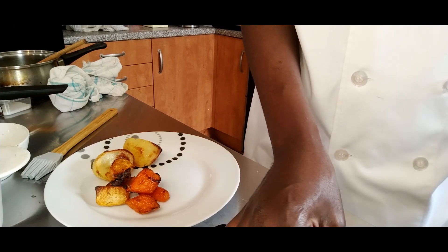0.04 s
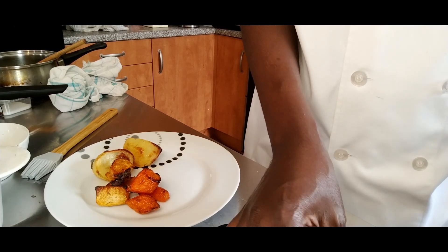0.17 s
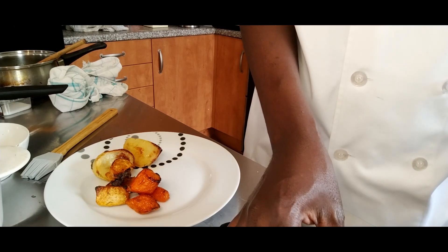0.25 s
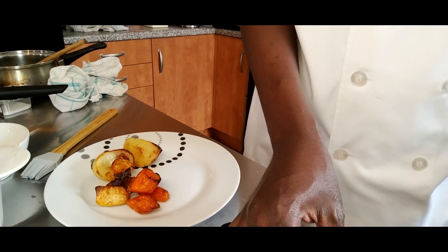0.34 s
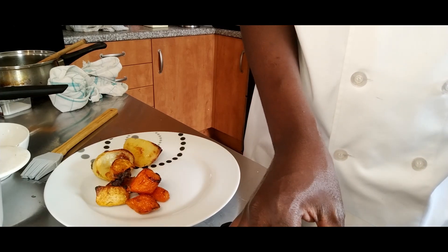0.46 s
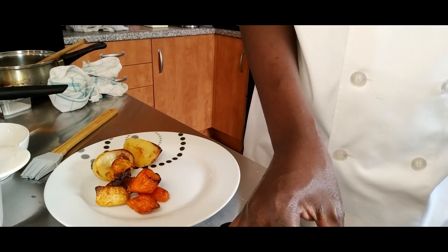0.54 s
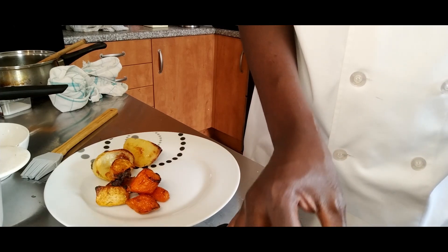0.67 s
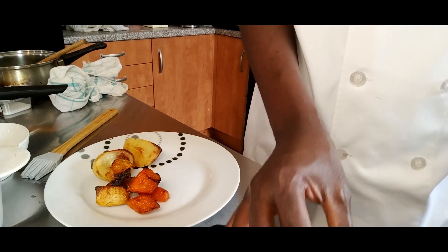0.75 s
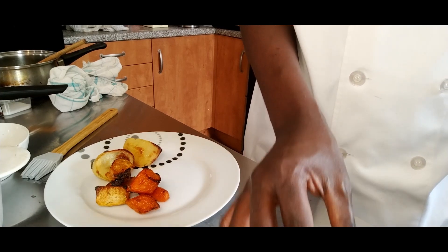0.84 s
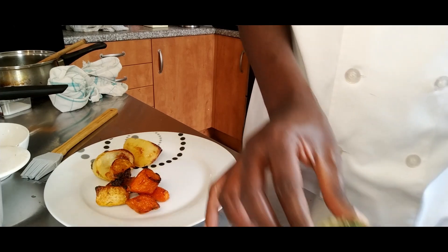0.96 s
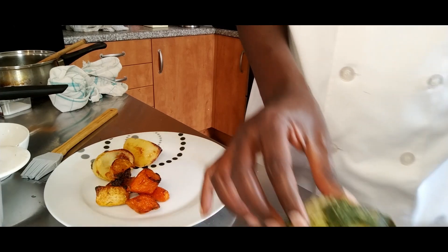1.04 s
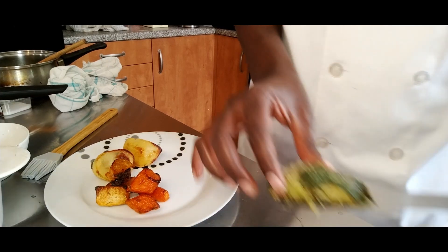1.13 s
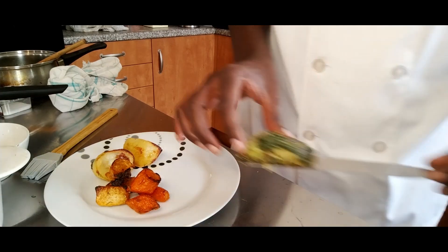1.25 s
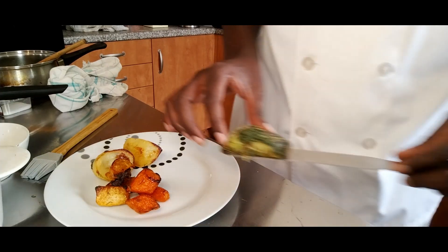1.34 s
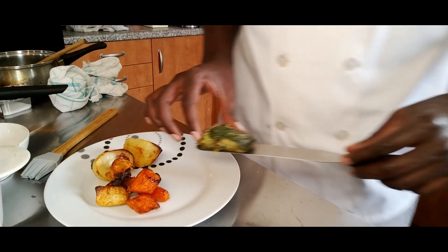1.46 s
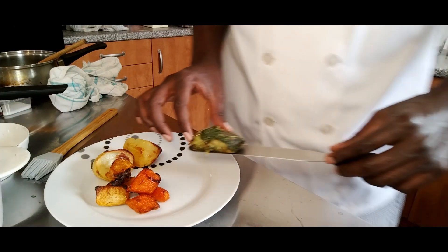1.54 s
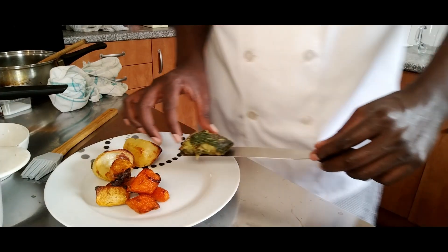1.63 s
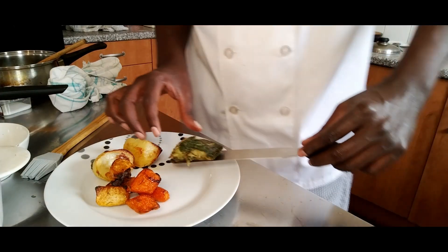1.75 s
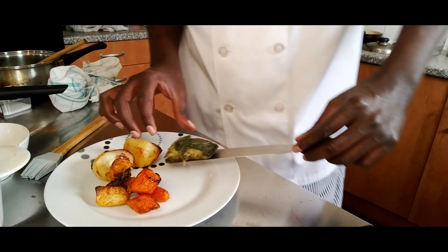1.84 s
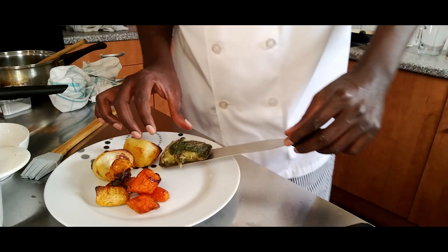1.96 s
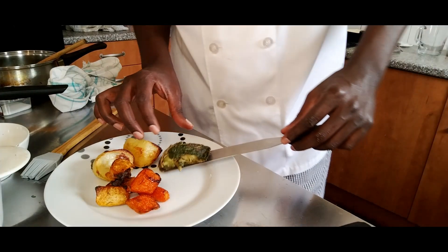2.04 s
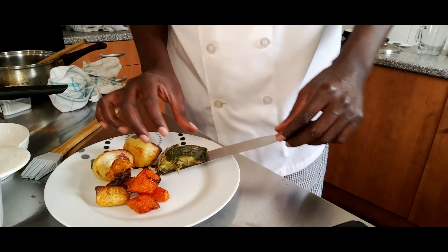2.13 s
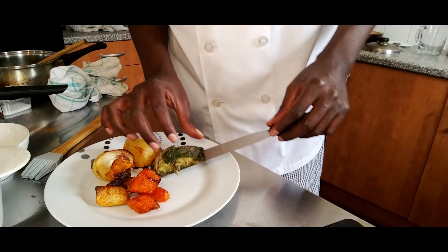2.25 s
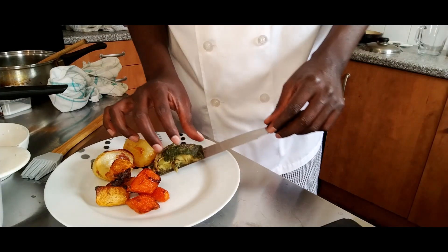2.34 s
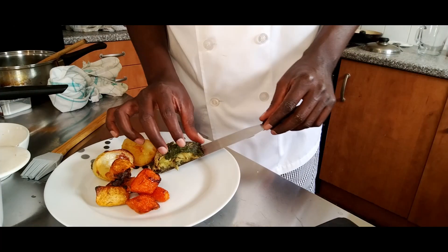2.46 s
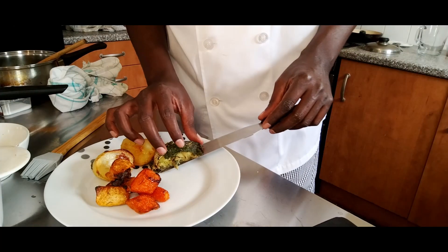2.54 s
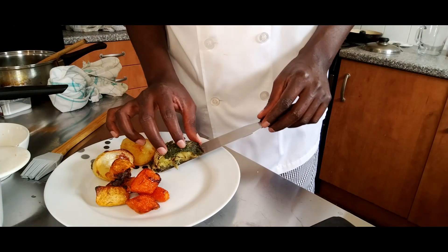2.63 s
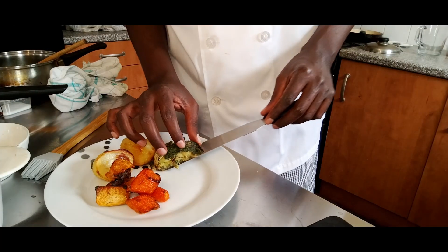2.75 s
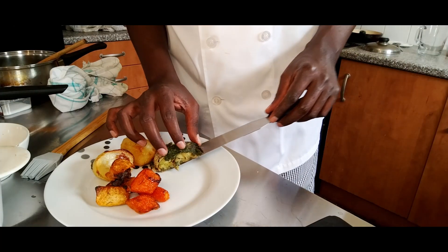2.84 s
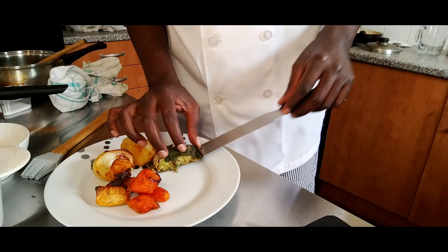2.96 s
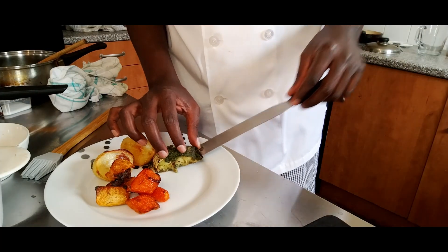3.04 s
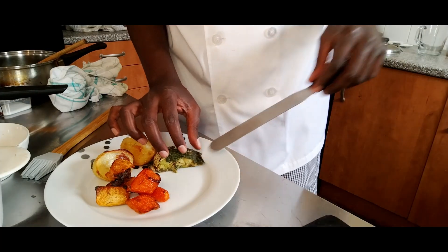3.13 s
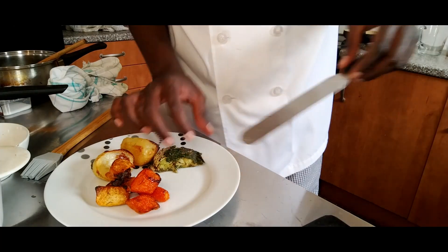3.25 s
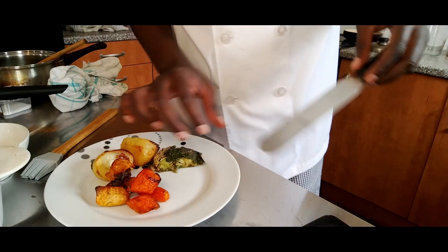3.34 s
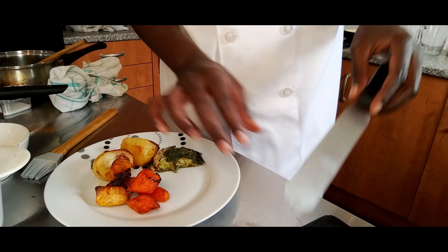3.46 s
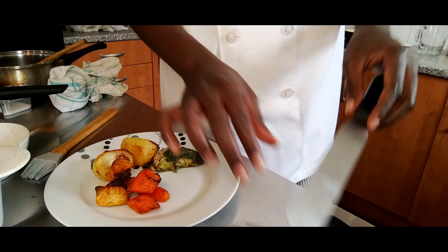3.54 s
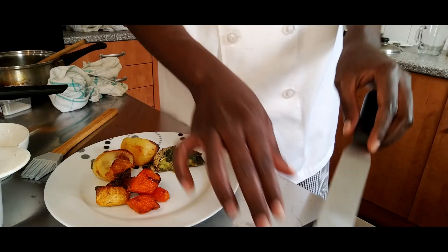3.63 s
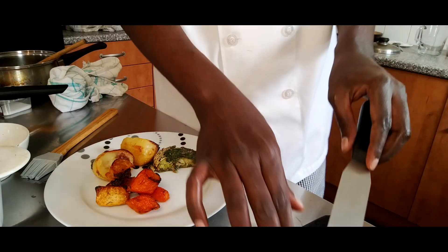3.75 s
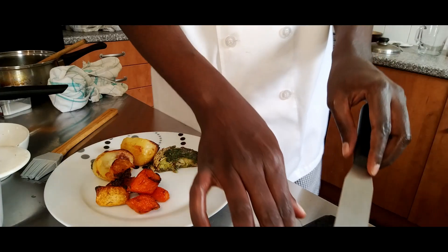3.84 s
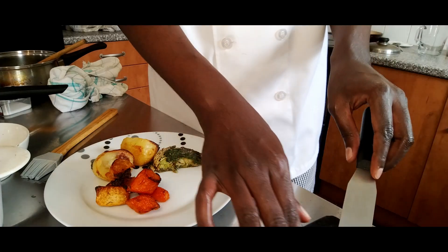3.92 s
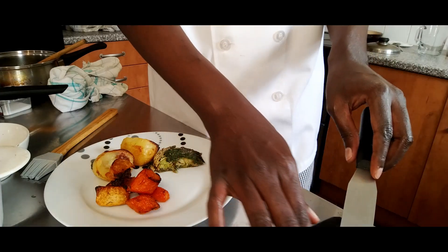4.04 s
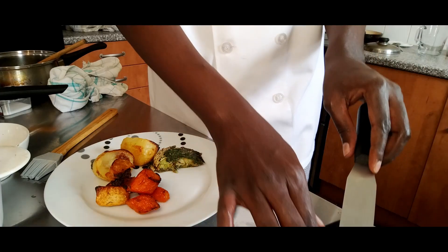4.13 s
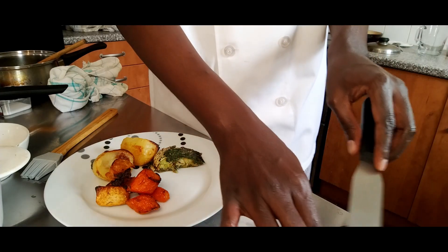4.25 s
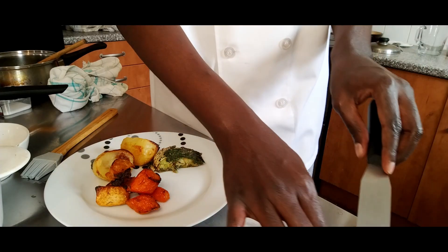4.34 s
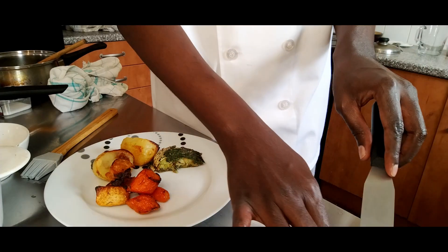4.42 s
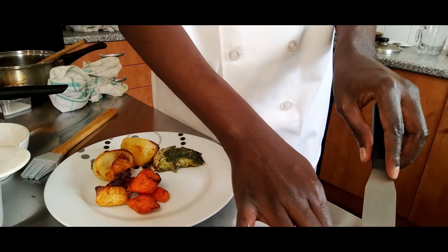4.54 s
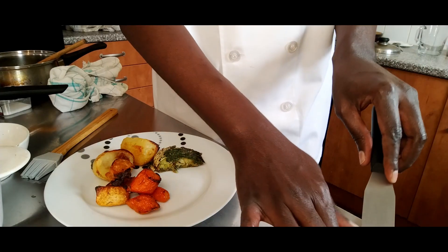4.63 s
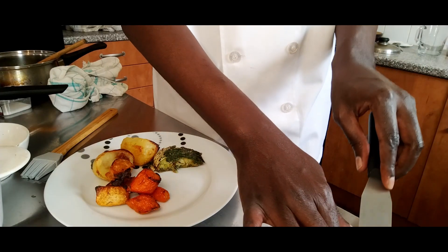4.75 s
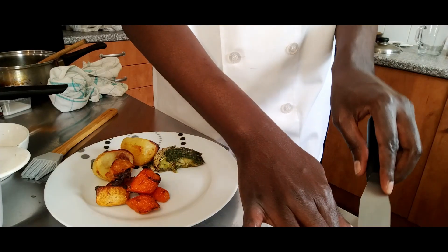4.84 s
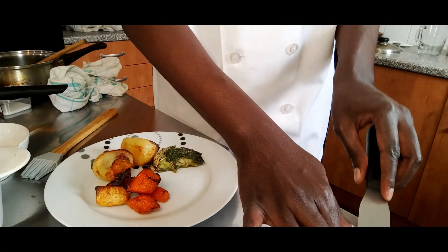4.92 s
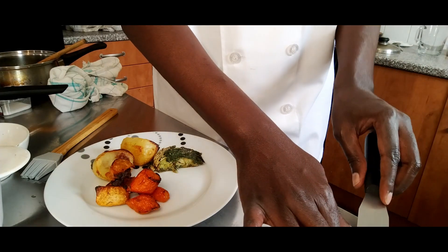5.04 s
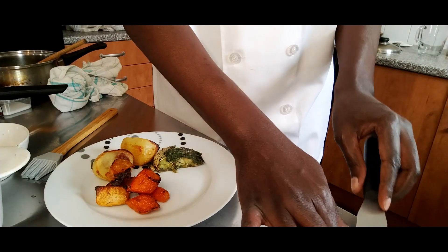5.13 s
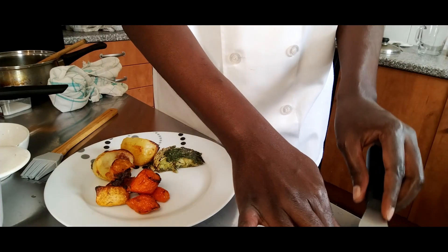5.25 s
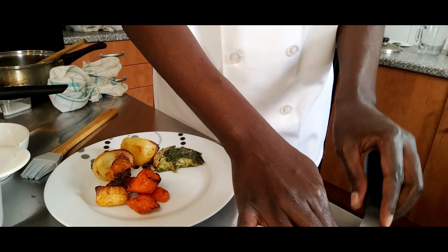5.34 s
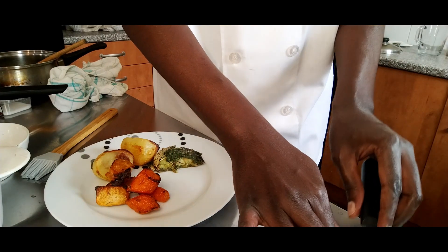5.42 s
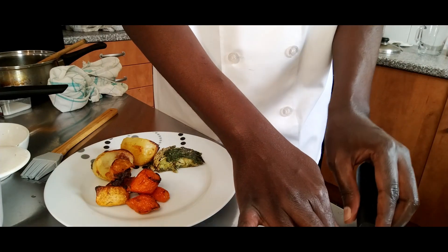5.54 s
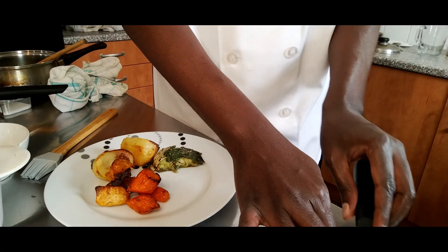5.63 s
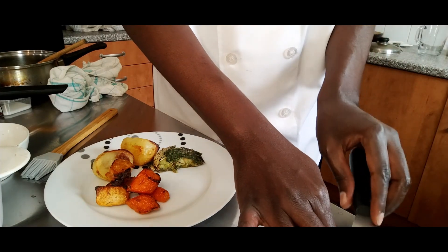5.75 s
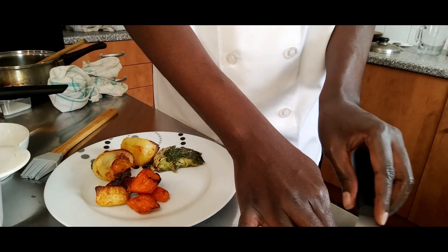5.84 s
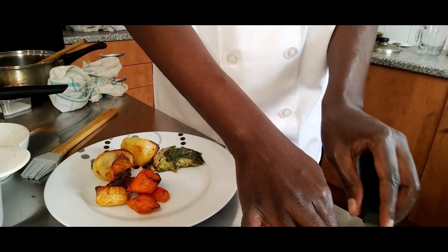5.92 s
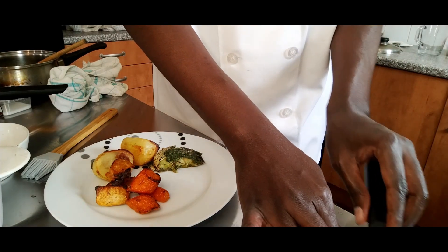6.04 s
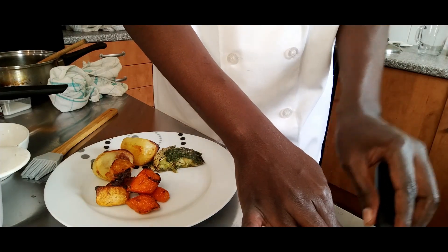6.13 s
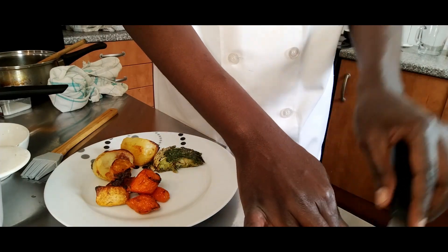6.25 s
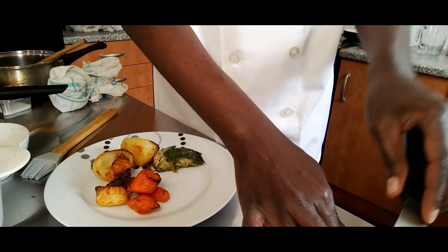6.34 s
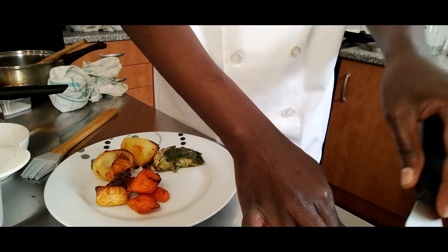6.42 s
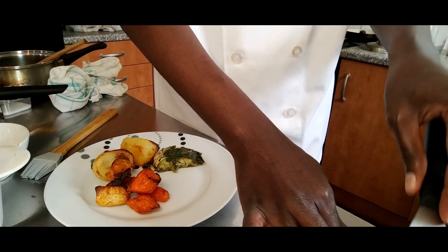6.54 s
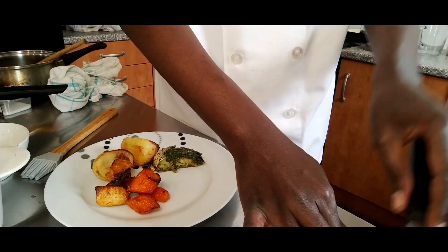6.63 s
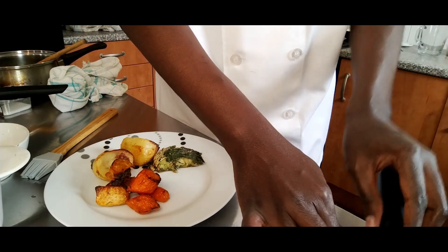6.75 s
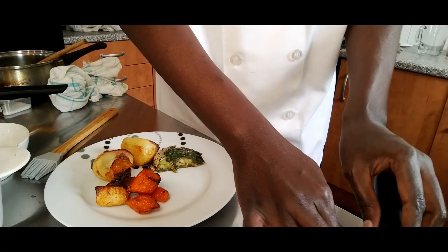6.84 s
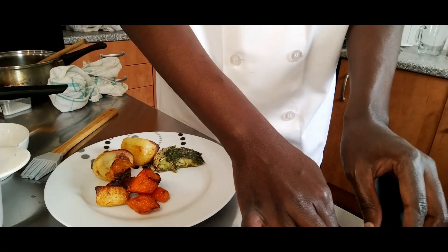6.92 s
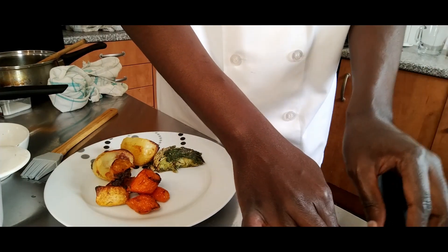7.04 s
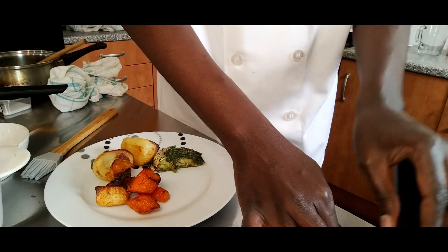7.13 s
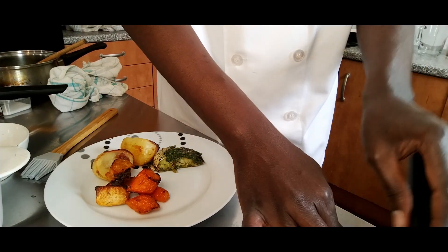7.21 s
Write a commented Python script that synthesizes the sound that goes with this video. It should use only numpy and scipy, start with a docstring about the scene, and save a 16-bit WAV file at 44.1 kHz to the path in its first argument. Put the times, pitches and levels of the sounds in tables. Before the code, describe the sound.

Crinkly sheet rustles and snaps on a tray, a pause with two light knife taps on a plate, then denser crackling over a faint fan hum.

```python
"""Close at a kitchen worktop, two microphones hear hands crumple a crinkly sheet on a tray: it rustles and snaps.
After the first second only cloth whispers; a sleeve brushes past, then a knife taps a ceramic plate twice.
A hand thumps the worktop, the blade pings faintly, and from about four seconds the sheet snaps again, ever denser.
Sheet: coloured grains, cracks and rings; plate: damped modes; thumps and rumble: low noise.
Throughout, a fan of shaped noise and tones, with hum, fills the room; the near sounds leave a short noise tail."""
import sys
import numpy as np
from scipy import signal
from scipy.fft import rfft, irfft, next_fast_len
from scipy.io import wavfile
from scipy.ndimage import uniform_filter1d

SR = 44100
rng = np.random.default_rng(int(sys.argv[2]) if len(sys.argv) > 2 else 0)


def digitize_waveform(pressure):
    """Quantize a signal to 16-bit integers and store it at the path in sys.argv[1].

    Rows of a 2-D input are taken as channels; values are limited to [-1, 1].
    """
    field = np.atleast_2d(pressure).T
    bounded = np.clip(field, -1, 1)
    quanta = np.round(bounded * 32767).astype(np.int16)
    wavfile.write(sys.argv[1], SR, quanta)


N = 321048

# bright voice of sheet and plate: (frequency [Hz], relative density [dB])
CRISP_SPECTRUM = [(3500, -14), (6000, 4.5), (8500, 9), (10500, 15), (12500, 13.5), (14000, 8)]
# dull voice of sheet and plate: (frequency [Hz], relative density [dB])
DULL_SPECTRUM = [(250, -62), (600, -7), (1000, -12), (1500, 1), (2100, 4.5), (2800, 3.5), (4000, 1.5),
                 (6000, 6), (9000, -21.5)]
# rings of the tray under the rub: (frequency [Hz], width [Hz], level [dB])
TRAY_RINGS = [(2800, 680, -8.5), (4140, 260, -10.5)]
# where the hand works the sheet: (time [s], left minus right [dB])
HAND_PLACE = [(0.0, 8), (0.4, 4), (0.7, 2.5), (2.0, -18), (4.0, -1.5), (5.2, 9), (5.6, 6.5), (6.1, -4),
              (6.5, 4), (7.279, 6)]

SHARED = 0.2             # share of power in a wide source that reaches both microphones alike
DULL_PAN_SHARE = 0.11    # the dull voice follows this much of the panning
RIGHT_LAG_S = 0.00027    # the right side lags by this in all but the plate's ring, which reaches the right first


def from_db(db):
    """Gain of a level in dB."""
    return 10 ** (np.asarray(db) / 20)


def rms_one(x):
    """Scaled to unit rms."""
    return x / np.sqrt(np.mean(x ** 2) + 1e-20)


def at_hz(points, hz):
    """A spectrum table read on a log frequency axis."""
    table_hz, table_db = np.transpose(points)
    return np.interp(np.log(hz), np.log(table_hz), table_db)


def in_time(rows, t):
    """The columns of a curve read at times t."""
    s, *columns = np.transpose(rows)
    return np.array([np.interp(t, s, c) for c in columns])


def drift(rate):
    """Slow random curve of unit rms: noise through two equal low-passes with their corner at rate [Hz]."""
    step = 40    # samples from one drawn point to the next
    r = np.exp(-2 * np.pi * rate * step / SR)
    noise = rng.standard_normal(N // step + 2002)
    slow = signal.lfilter([1], [1, -2 * r, r * r], noise)[2000:]    # settled part
    return np.interp(np.arange(N) / step, np.arange(len(slow)), rms_one(slow))


def sides(pan_db):
    """Left and right gain for a left-minus-right level, with power kept; both are 1 at the centre."""
    left = from_db(pan_db)
    return np.array([left, np.ones_like(left)]) * np.sqrt(2) / np.sqrt(1 + left ** 2)


def pair(common, left, right):
    """Part of a wide source reaches both microphones alike, the rest each its own way."""
    return np.sqrt(SHARED) * common + np.sqrt(1 - SHARED) * np.array([left, right])


def colour(x, spectrum, keep_rms=True):
    """Causal minimum-phase filter of a given shape; by default white noise keeps its rms."""
    size = 2048
    log_gain = np.log(from_db(at_hz(spectrum, np.fft.rfftfreq(size, 1 / SR) + 1)))
    cepstrum = irfft(log_gain)
    cepstrum[1:size // 2] *= 2      # folding the cepstrum gives the minimum phase
    cepstrum[size // 2 + 1:] = 0
    taps = irfft(np.exp(rfft(cepstrum)))
    if keep_rms:
        taps = taps / np.linalg.norm(taps)
    return signal.fftconvolve(x, taps[None], axes=1)[:, :N]


def resonance(x, hz, width):
    """Two-pole band around hz, width in Hz, with gain 1 on top."""
    r = np.exp(-np.pi * width / SR)
    feedback = [1, -2 * r * np.cos(2 * np.pi * hz / SR), r * r]
    return signal.lfilter(np.array([1, 0, -1]) * (1 - r * r) / 2, feedback, x)


def rustle():
    """Tiny buckles of uneven size come in clumps with lone ticks; one train feeds the crisp and the dull voice."""
    grains_per_s, grain_spread_db = 9000, 2
    ticks_per_s, tick_db, tick_s = 150, 4, 0.0006    # smallest tick level, re the grains; decay time
    hand_wander_db, pan_share = 2, 0.35
    # level of the rub below the split: (time [s], level [dB])
    rub_low = [(0, 4.5), (1, 6), (4, -5), (4.9, 0.5), (5.4, 3.5), (6.4, 5), (7.279, 18)]
    rub_split_hz = 1520

    t = np.arange(N) / SR
    crisp_db, dull_db = effort()
    pan_db = pan_share * in_time(HAND_PLACE, t)[0] + hand_wander_db * drift(0.82)

    sizes = from_db(grain_spread_db * np.minimum(rng.exponential(1, (3, N)), 4.0))
    sizes = sizes * rng.choice([-1, 1], (3, N))
    buckles = sizes * (rng.random((3, N)) < grains_per_s / SR)
    grains = patches(pair(*buckles), patchy_db=1.8)

    tick_gain = from_db(tick_db + 3 * np.minimum(rng.exponential(1, N), 2))
    struck = (rng.random(N) < ticks_per_s / SR) * tick_gain
    tick_decay = signal.lfilter([1], [1, -np.exp(-1 / (tick_s * SR))], struck + 1e-18)
    grains = grains + tick_decay * pair(*rng.standard_normal((3, N)))

    clumps_db = 1.6 * drift(69.8) + 0.6 * drift(32)
    crisp = grains * from_db(crisp_db + clumps_db) * sides(pan_db)
    dull = grains * from_db(dull_db + clumps_db + 0.74 * drift(33)) * sides(DULL_PAN_SHARE * pan_db)
    low = signal.sosfilt(signal.butter(3, rub_split_hz, "low", fs=SR, output="sos"), dull)
    high = signal.sosfilt(signal.butter(3, rub_split_hz, "high", fs=SR, output="sos"), dull)
    dull = high + low * from_db(in_time(rub_low, t))
    tray = sum(from_db(level_db) * resonance(dull, hz, width) for hz, width, level_db in TRAY_RINGS)
    return crisp, dull + tray


def effort():
    """Crisp and dull level in dB: each squeeze swells at its own pace, holds and lets go, over whispering cloth."""
    # one squeeze of the sheet a row:
    # (full strength reached [s], hold [s], crisp rustle [dB], dull rub [dB], rise [dB/s])
    squeezes = [(0.01, 0.0046, -41, -52, 550), (0.117, 0.094, -43.5, -47.5, 550),
                (0.316, 0.023, -29.5, -55, 551.5), (0.361, 0.02, -19, -38, 6000),
                (0.463, 0.004, -41.5, -49, 550), (0.665, 0.064, -34, -49.5, 900),
                (0.806, 0.033, -25, -47, 550), (4.389, 0.039, -35, -33, 15000),
                (4.548, 0.023, -34.5, -44, 548), (4.672, 0.0046, -36.5, -48, 550),
                (4.8, 0.093, -37, -45, 559), (4.948, 0.058, -40, -52, 549), (5.13, 0.0035, -31, -38.5, 540),
                (5.19, 0.0065, -32.5, -43, 900), (5.242, 0.24, -35, -41.5, 900),
                (5.415, 0.11, -28, -35, 550), (5.554, 0.014, -25.5, -42, 900),
                (5.584, 0.044, -30.5, -38.5, 550), (5.693, 0.038, -30, -37, 550),
                (5.812, 0.17, -36, -41.5, 550), (6.017, 0.049, -28, -32, 550),
                (6.091, 0.0093, -25.5, -35, 550), (6.156, 0.077, -26.5, -33.5, 900),
                (6.263, 0.024, -27.5, -33, 566), (6.351, 0.021, -26, -32.5, 1200),
                (6.406, 0.055, -28, -34, 902), (6.547, 0.0055, -41, -47, 560),
                (6.645, 0.042, -47.5, -50.5, 554), (6.834, 0.044, -41, -46, 555),
                (6.902, 0.029, -32.5, -42, 901), (6.98, 0.11, -44, -56.5, 550),
                (7.096, .005, -44, -46, 550), (7.188, 0.004, -34.5, -50, 550)]
    # whisper of cloth, swelling as the sleeve brushes past: (time [s], crisp level [dB], dull level [dB])
    cloth = [(0.0, -50, -58), (1.0, -69.5, -69), (1.35, -62, -66.5), (1.748, -61.5, -76), (1.898, -64, -73),
             (2.089, -52, -58.5), (2.2, -64, -70.5), (2.397, -73, -103), (3.9, -72, -74.5),
             (4.4, -66, -60.5), (7.279, -57, -63)]
    fall_db_per_s = 477

    t = np.arange(0, N + 32, 32) / SR
    power = from_db(2 * in_time(cloth, t))    # twice the dB: power, not amplitude
    for s, hold, *levels_db, rise in squeezes:
        swell_db = rise * (t - s)
        release_db = fall_db_per_s * (s + hold - t)
        shape_db = np.minimum(0, np.minimum(swell_db, release_db))
        power = power + from_db(2 * (np.array(levels_db)[:, None] + shape_db))
    return [np.interp(np.arange(N) / SR, t, 10 * np.log10(p)) for p in power]


def patches(x, patchy_db):
    """Each panel of the sheet speaks in a band of its own and comes and goes by itself; the sum has unit rms."""
    edges = 200 * 1.4 ** np.arange(14)    # Hz
    total = 0
    for k, (low, high) in enumerate(zip(edges, edges[1:])):
        band = signal.sosfilt(signal.butter(1, [low, high], "band", fs=SR, output="sos"), x)
        total = total + (-1) ** k * from_db(patchy_db * drift(25)) * band
    return rms_one(total)


def snaps():
    """A crease cracks sharply, then the sheet around it shivers and dies; each panel rings at its own pitch."""
    # creases snapping and faint ticks:
    # (time [s], level [dB], dull part re that level [dB], pitch of the dull part [Hz], shiver t60 [s])
    creases = [(0.0096, -28, -19, 4930, .025), (0.018, -18, -18.5, 4760, 0.024),
               (0.0316, -24.5, -28, 4900, 0.026), (0.048, -24.5, -17.5, 2530, 0.052),
               (0.0883, -25, -30, 4010, 0.027), (0.0958, -18, -15, 5000, 0.054),
               (0.102, -28, -14, 3230, .04), (0.2184, -21, -6, 4670, 0.029),
               (0.2917, -23.5, -23, 4520, 0.043), (0.32, -32, -31, 3880, 0.03),
               (0.3362, -16.5, -15.5, 4400, 0.27), (0.389, -13.5, -10.5, 4770, 0.071),
               (0.5516, -41, -17, 1970, 0.035), (0.5947, -41, -30, 4000, 0.03),
               (0.6943, -12, -16, 2590, 0.058), (0.8168, -11, -30, 4530, 0.02),
               (0.8215, -6, -22.5, 4250, 0.064), (0.918, -22.5, -17.5, 2250, 0.037),
               (1.0086, -39, -15, 2360, 0.099), (1.85, -65, 8, 2000, 0.085), (2.8488, -65, -2, 2510, 0.054),
               (2.935, -46.5, -9.5, 2460, 0.084), (3.9829, -28, -5, 3170, 0.11),
               (3.997, -20, -6.5, 2830, 0.07), (4.0931, -27, -6, 2960, 0.09),
               (4.2069, -16, -12, 2780, 0.53), (4.2101, -21, -3, 2700, 0.015),
               (4.2474, -12, -26, 2740, 0.038), (4.2496, -9.5, -3.5, 2650, 0.033),
               (4.4311, -16, -20, 3140, 0.01), (4.4558, -21.5, -19, 2920, 0.047),
               (4.537, -36, -29, 3000, 0.023), (4.558, -24.5, -17, 2940, .03),
               (4.659, -28, -19, 2720, 0.031), (4.677, -22, -13.5, 3300, 0.094),
               (4.684, -14.5, -29, 2730, 0.025), (4.69, -29, -19, 2800, .03), (4.77, -31, -12, 2570, 0.097),
               (4.8428, -23.5, -13, 2960, 0.022), (4.9641, -21.5, -32, 3900, 0.035),
               (4.976, -29, -21, 2730, 0.025), (5.0024, -20, -18.5, 2760, 0.072),
               (5.095, -29.5, -16, 3580, 0.04), (5.1835, -13.5, -26, 4740, 0.023),
               (5.1934, -29, -19, 4000, 0.032), (5.197, -28, -20, 2980, 0.035),
               (5.255, -21, -23, 2820, 0.044), (5.2609, -31, -16, 3000, 0.044),
               (5.364, -21, -12, 2800, 0.04), (5.37, -18, -20, 3000, 0.018),
               (5.3805, -12.5, -15, 3300, 0.19), (5.4982, -11.5, -10.5, 4140, 0.045),
               (5.5396, -10.5, -20, 3400, 0.04), (5.5446, -17, -25, 3500, .02),
               (5.549, -8.5, -12, 3800, 0.3), (5.6135, -19, -23, 2120, 0.015),
               (5.6525, -26, -26, 4000, 0.024), (5.6716, -23, -26, 3100, 0.051),
               (5.6847, -17, -10, 4500, 0.066), (5.6956, -7, -25, 2880, 0.016),
               (5.7195, -6, -31, 3020, 0.041), (5.8342, -11.5, -19, 3400, 0.066),
               (5.8855, -11, -39, 3150, 0.052), (5.9165, -25, -28, 3000, .02),
               (5.9624, -20, -18, 2060, 0.026), (5.998, -21, -25, 3000, .03), (6.019, -13, -7, 3380, 0.024),
               (6.085, -10, -19, 3120, 0.026), (6.1215, -16, -24, 3000, 0.026),
               (6.1493, -5, -30, 3500, 0.019), (6.16, -13, -25, 3500, 0.029),
               (6.1649, -0.5, -24, 4500, 0.043), (6.233, -19, -17, 3000, .02),
               (6.285, -12, -19, 2600, 0.035), (6.292, -14, -12, 4930, 0.033),
               (6.3494, -12.5, -32, 3500, 0.025), (6.361, -15.5, -25, 3500, 0.044),
               (6.4027, -14.5, -17, 3540, 0.04), (6.406, -9.5, -22, 3500, 0.061),
               (6.425, -5, -22, 4250, 0.1), (6.4595, -16, -11.5, 2200, 0.03),
               (6.548, -18, -23, 4540, 0.021), (6.578, -22, -25, 3450, 0.03),
               (6.625, -27, -12, 4130, 0.035), (6.6355, -21.5, -19, 4030, 0.063),
               (6.7014, -10, -20, 4600, 0.03), (6.7045, -8, -25, 2040, 0.085),
               (6.7308, -29, -9, 4100, 0.033), (6.7989, -24, -14.5, 4040, 0.11),
               (6.842, -22.5, -21, 2780, 0.03), (6.904, -22, -23, 1830, 0.04),
               (6.935, -27, -29, 3000, 0.018), (7.007, -25.5, -24, 4210, 0.019),
               (7.0367, -24.5, -30, 4800, 0.025), (7.0517, -30, -14, 4000, .02),
               (7.0847, -13, -11, 4840, 0.04), (7.108, -14, -38, 4000, 0.036),
               (7.1271, -12, -40, 1800, 0.023), (7.1388, -11, -16.5, 4400, 0.067),
               (7.206, -13.5, -28, 2660, 0.022), (7.2135, -28, -21, 3000, .03)]
    crack_db, crack_loss_db_per_s = 12.5, 90    # first break; softer the longer the shiver
    pan_scatter_db, pop_shiver_share = 4.5, 0.25
    ring_db, ring_width_hz = 20, 700
    ring_loss_db_per_octave = 9    # panels ring best near the first ring of the tray
    body_hz, body_width_hz, body_db = 900, 200, 4    # the tray knocks along under a crease

    crisp, dull = np.zeros((2, 2, N + 8000))
    t = np.arange(8000) / SR
    for s, level_db, dull_db, hz, t60 in creases:
        pan_db = in_time(HAND_PLACE, s)[0] + pan_scatter_db * rng.standard_normal()
        i = round(s * SR)
        noise = pair(*rng.standard_normal((3, 8000)))
        after = from_db(5.0 * np.repeat(rng.standard_normal(100), 80))    # smaller buckles follow unevenly
        shiver = noise * (0.6 * np.exp(-t / 0.0011) + 0.3 * after * from_db(-60 * t / t60))
        shiver[:, 0] += from_db(crack_db - crack_loss_db_per_s * t60) * rng.choice([-1, 1])    # one clean break

        # the break alone sets off most of the ring
        pop = pop_shiver_share * shiver + (1 - pop_shiver_share) * shiver * (t == 0)
        ring = resonance(resonance(pop, hz, ring_width_hz), hz, ring_width_hz)
        octaves_off = abs(np.log2(hz / TRAY_RINGS[0][0]))
        ringing = 1.55 * shiver + from_db(ring_db - ring_loss_db_per_octave * octaves_off) * ring

        crisp[:, i:i + 8000] += from_db(level_db) * shiver * sides(pan_db)[:, None]
        dull[:, i:i + 8000] += from_db(level_db + dull_db) * ringing * sides(DULL_PAN_SHARE * pan_db)[:, None]

    crisp, dull = crisp[:, :N], dull[:, :N]
    thin = signal.butter(4, 2100, "high", fs=SR, output="sos")    # a small crease moves too little air for bass
    body = resonance(resonance(dull, body_hz, body_width_hz), body_hz, body_width_hz)
    return crisp, signal.sosfilt(thin, dull) + from_db(body_db) * body


def plate():
    """Each tap is three quick touches, so the ring swells; food damps all modes. Later the blade pings faintly."""
    # knife on plate: (time [s], level [dB], bright crack re that level [dB])
    touches = [(2.444, -39, -21), (2.5555, -32, -9)]
    # modes of the plate: (frequency [Hz], level [dB], t60 [s])
    modes = [(1625, -12, 0.04), (1685, -14, 0.04), (1980, -16, 0.03), (2500, -12, 0.045), (2560, -14, 0.04),
             (3090, -11, 0.025), (4220, -10, 0.014), (8400, -15, 0.02), (5380, -14, 0.026),
             (7300, -16, 0.02), (7800, -20, .03)]
    # faint ring of the blade slipping free: (time [s], frequency [Hz], level [dB])
    pings = [(2.983, 11400, -59), (3.192, 9500, -56)]
    ping_t60_s, crack_t60_s = 0.12, 0.062
    chatter_s = 0.0012        # from one touch to the next
    left_lag_s = 0.00007      # the plate lies nearer the right microphone

    push, crack = np.full(N, 1e-18), np.zeros((2, N))
    t = np.arange(4000) / SR
    for s, level_db, crack_db in touches:
        i = round(s * SR)
        push[i + np.arange(3) * round(chatter_s * SR)] += from_db(level_db) * np.array([0.5, 1, 0.7])
        decay = from_db(level_db + crack_db - 60 * t / crack_t60_s)
        crack[:, i:i + 4000] += decay * rng.standard_normal((2, 4000))

    ring = 0
    for k, (hz, level_db, t60) in enumerate(modes):
        r, w = from_db(-60 / (t60 * SR)), 2 * np.pi * hz / SR
        mode = signal.lfilter([0, from_db(level_db) * np.sin(w)], [1, -2 * r * np.cos(w), r * r], push)
        ring = ring + (-1) ** (k // 2) * mode
    for s, hz, level_db in pings:
        ring[round(s * SR):][:4000] += from_db(level_db - 60 * t / ping_t60_s) * np.sin(2 * np.pi * hz * t)

    # scene() delays the right side, so the left needs that lag as well as its own
    late = np.roll(ring, round((RIGHT_LAG_S + left_lag_s) * SR))
    return np.array([late, ring]) + colour(crack, CRISP_SPECTRUM) + colour(crack, DULL_SPECTRUM)


def thumps():
    """Soft flesh on a board: a low puff of noise that swells for a moment and dies."""
    # hand on the worktop: (time [s], level 2 dB above the puff before its swell [dB], t60 [s])
    presses = [(2.825, -31.5, 0.064), (3.797, -38, 0.053), (4.851, -31.5, 0.069), (5.236, -29, 0.15),
               (6.188, -29, 0.087)]
    out, t = np.zeros(N), np.arange(8000) / SR
    low = signal.butter(2, [130, 480], "band", fs=SR, output="sos")
    for s, level_db, t60 in presses:
        puff = rms_one(signal.sosfilt(low, rng.standard_normal(8000)))
        swell = 1 - np.exp(-t / 0.019)
        out[round(s * SR):][:8000] += from_db(level_db - 2.0 - 60 * t / t60) * swell * puff
    return out


def rumble():
    """The harder the rub, the more the worktop rumbles along: low noise that follows the smoothed dull level."""
    base_db, follow = -27.5, 0.63    # level at a rub of 0 dB, before the flicker; dB per dB of rub
    low = signal.sosfilt(signal.butter(1, [30, 750], "band", fs=SR, output="sos"), rng.standard_normal(N))
    rub_db = uniform_filter1d(effort()[1], SR // 5)
    return from_db(base_db + follow * rub_db + 4.97 * drift(59)) * rms_one(low)


def fan():
    """Air noise, alike at both microphones in the bass, with wavering tones and a whine; its level flickers."""
    # air noise: (frequency [Hz], relative density [dB])
    air = [(15, -51.5), (25, -28), (69, -15.5), (85, -18.5), (113, -4.5), (156, -5.5), (188, -10),
           (355, -13), (416, -25), (727, -23.5), (1200, -29.5), (1840, -29), (2280, -36.5), (6070, -38),
           (14200, -39.5)]
    # hum and wavering tones: (frequency [Hz], width [Hz], rms before the flicker [dB])
    tones = [(100.8, 2.7, -60), (739, 44, -70.5), (440, 19.3, -75), (298, 43, -71.5)]
    # how alike the two microphones hear it: (frequency [Hz], left-right likeness [0 to 1])
    likeness = [(60, 0.94), (250, 0.98), (500, 0.8), (1000, 0.05), (8000, 0.11)]
    air_db = -54.5                      # rms before the flicker
    whine_hz, whine_db = 716, -75       # motor tone of steady pitch, rms before the flicker

    size = next_fast_len(N)
    hz = np.fft.rfftfreq(size, 1 / SR) + 1
    mid, side = rfft(rng.standard_normal((2, size)))
    alike = at_hz(likeness, hz)
    white = np.sqrt(1 + alike) * mid + np.sqrt(1 - alike) * side * [[1], [-1]]
    out = from_db(air_db) * rms_one(irfft(white * from_db(at_hz(air, hz)), size))
    for tone_hz, width, level_db in tones:
        peak = 1 / (1 + (2 * (hz - tone_hz) / width) ** 2)
        out = out + from_db(level_db) * rms_one(irfft(white * peak, size))
    whine = np.sqrt(2) * np.sin(2 * np.pi * whine_hz * np.arange(size) / SR)
    out = out + from_db(whine_db) * whine
    flicker = from_db(drift(24) + 1.3 * drift(17.0))
    return out[:, :N] * flicker * sides(1.0)[:, None]


def kitchen(x):
    """Room tail: dense dying noise, its own at each microphone and dulled by the walls."""
    t60_s, wall_cut_hz = 0.14, 10500
    t = np.arange(SR // 2) / SR
    tail = rng.standard_normal((2, len(t))) * from_db(-60 * t / t60_s) * (t > 0.003)
    tail = signal.lfilter(*signal.butter(1, wall_cut_hz, fs=SR), tail)
    tail /= np.linalg.norm(tail, axis=1, keepdims=True)
    return signal.fftconvolve(x, tail, axes=1)[:, :N]


def scene():
    """Sheet, plate, hands and fan; the right side has the near sounds duller and lags in all but the plate's ring."""
    # right microphone, turned away: (frequency [Hz], gain [dB])
    shadow = [(3000, -2), (6000, -0.5), (9000, 0.5), (11000, -14), (14000, -9.5)]
    room_db = -10.5
    crisp, dull = rustle()
    crisp_snaps, dull_snaps = snaps()
    sheet = colour(crisp + crisp_snaps, CRISP_SPECTRUM) + colour(dull + dull_snaps, DULL_SPECTRUM)
    near = sheet + plate() + thumps() + rumble()
    near[1:] = colour(near[1:], shadow, keep_rms=False)
    left, right = near + from_db(room_db) * kitchen(near) + fan()
    lag = round(RIGHT_LAG_S * SR)
    return np.array([left, np.r_[np.zeros(lag), right[:N - lag]]])


def record(dry):
    """The highest peaks are rounded; the band is limited, very faint above 14.8 kHz and silent above 16.6 kHz."""
    band_top_hz, faint_db, silent_hz = 14800, -42, 16600
    rounded = dry / (1 + np.abs(dry / 0.95) ** 4) ** 0.25
    below = signal.sosfilt(signal.cheby2(16, 60, band_top_hz, fs=SR, output="sos"), rounded)
    heard = below + from_db(faint_db) * rounded    # leaves the very faint band up to silent_hz
    return signal.sosfilt(signal.cheby2(12, 70, silent_hz, fs=SR, output="sos"), heard)


dry = scene()
out = record(dry)
digitize_waveform(out)
```